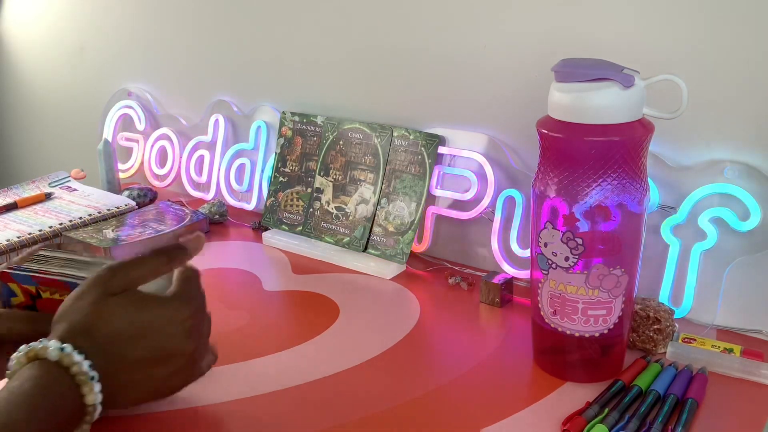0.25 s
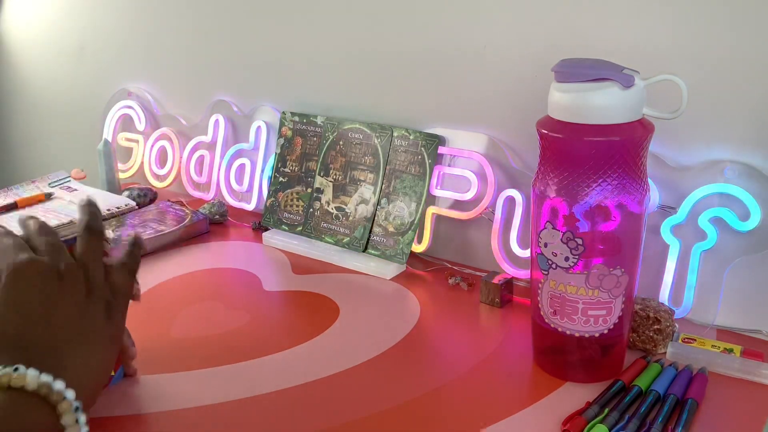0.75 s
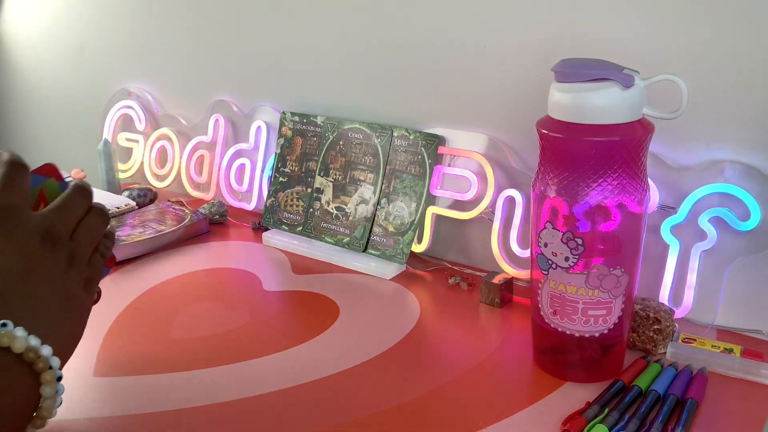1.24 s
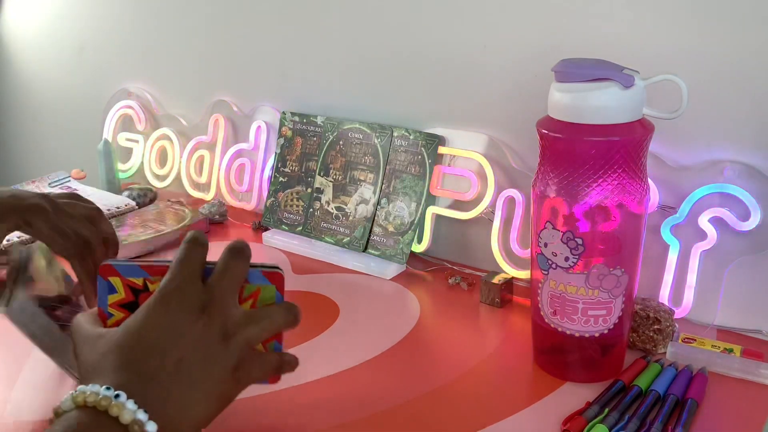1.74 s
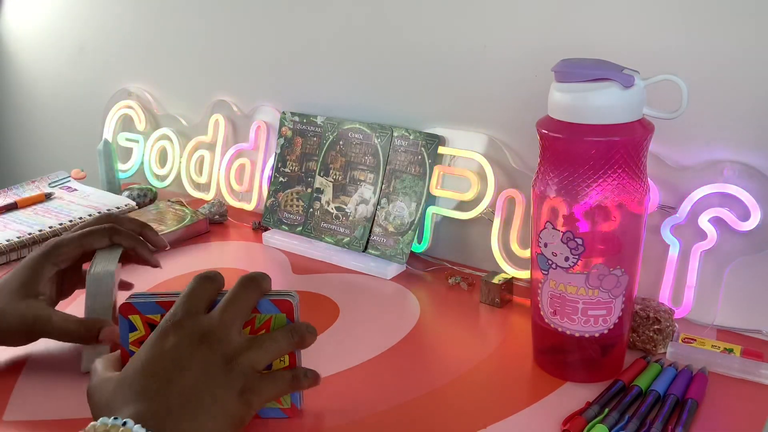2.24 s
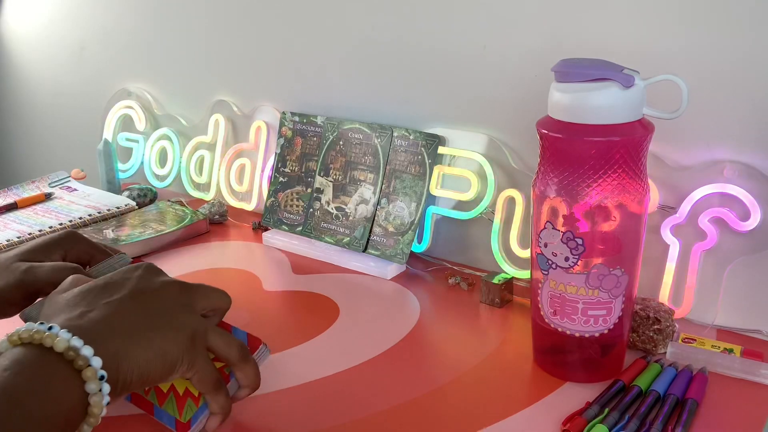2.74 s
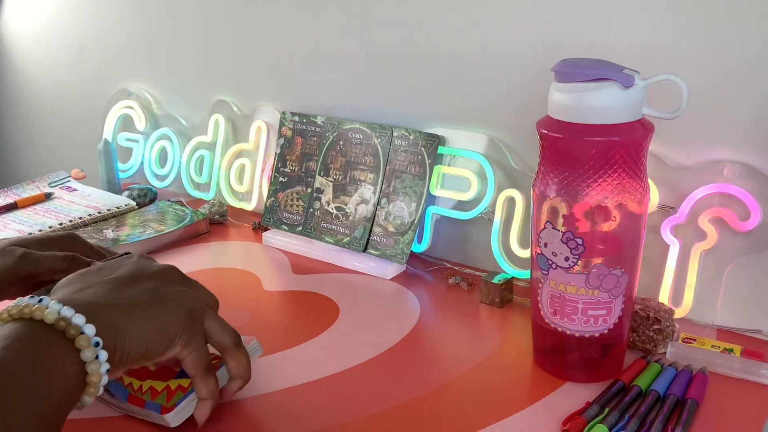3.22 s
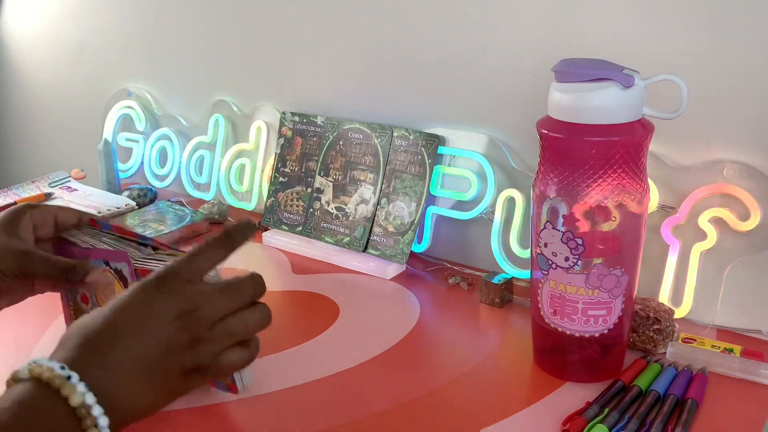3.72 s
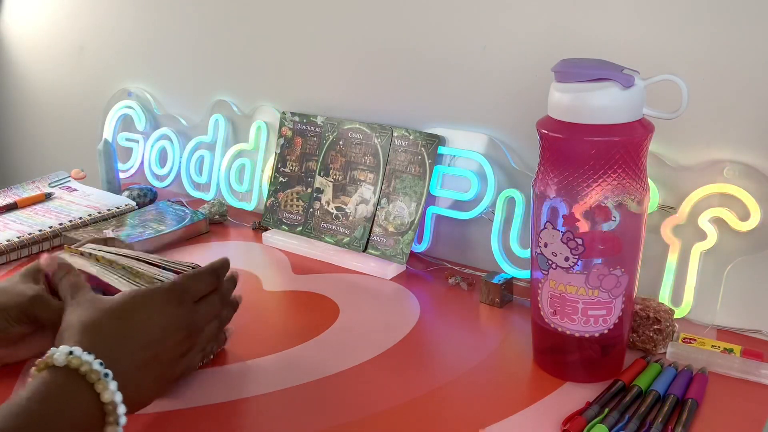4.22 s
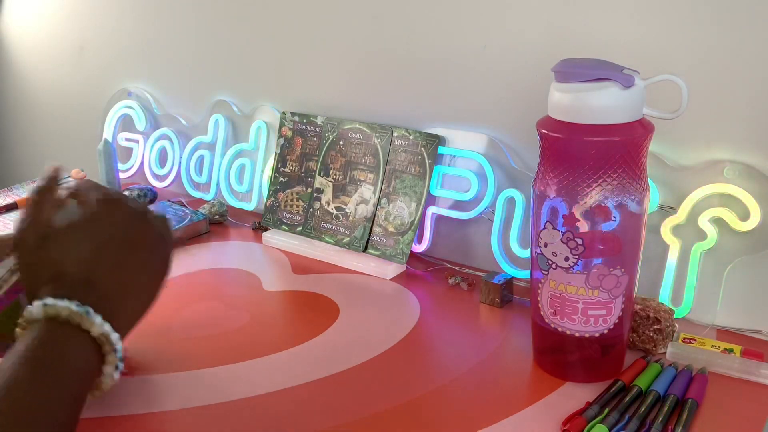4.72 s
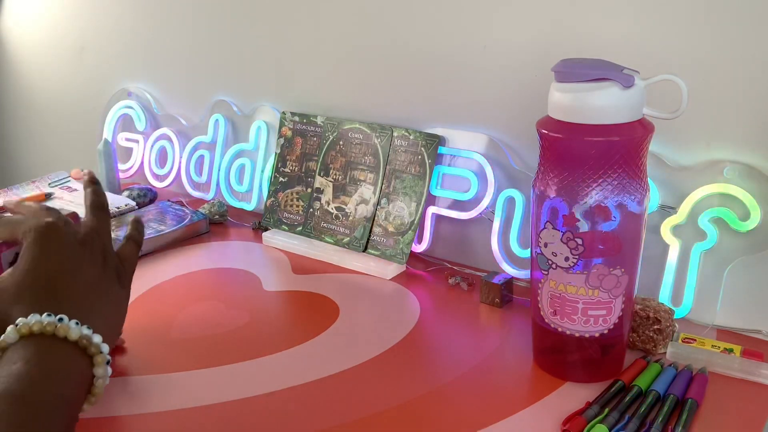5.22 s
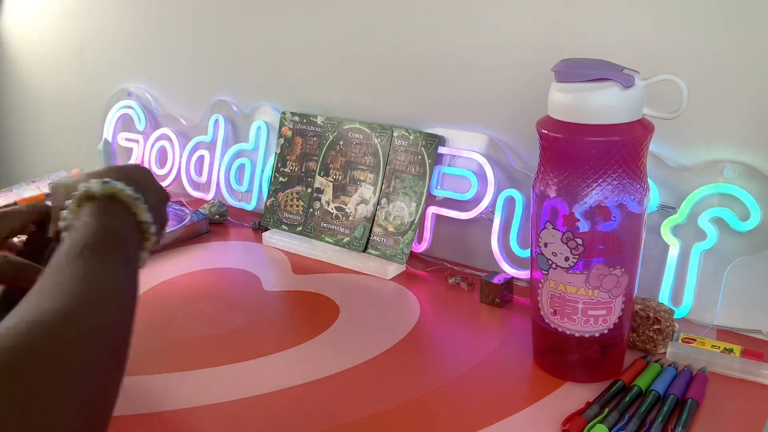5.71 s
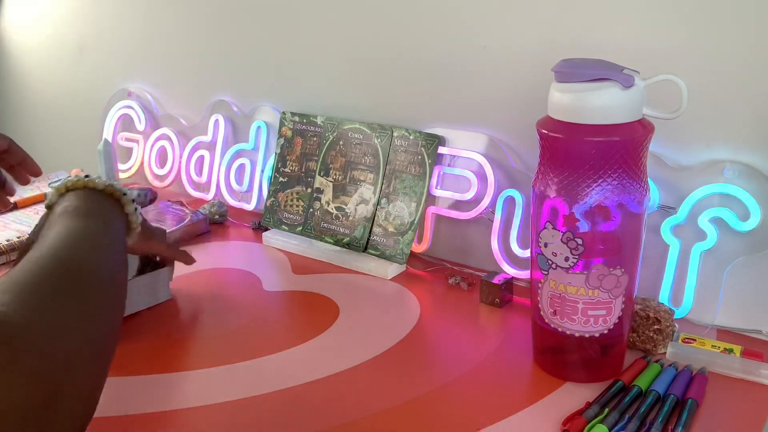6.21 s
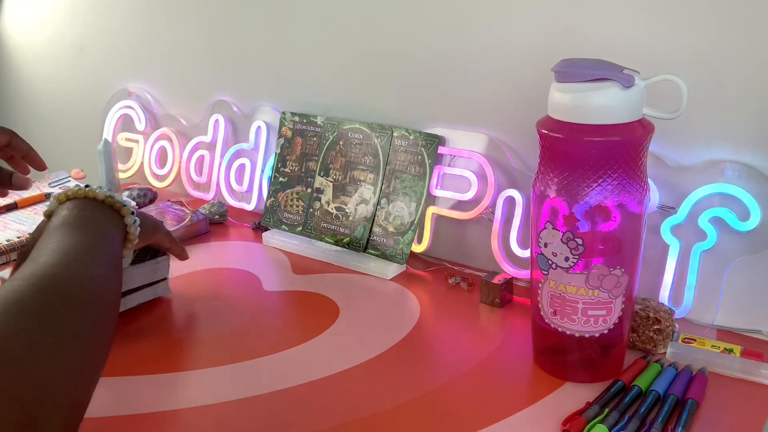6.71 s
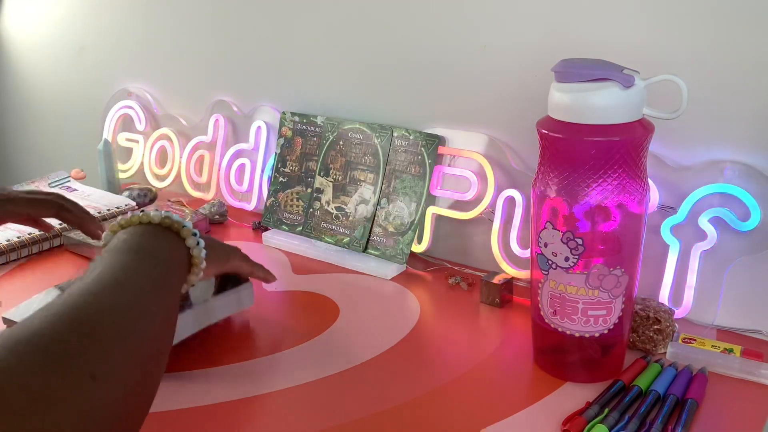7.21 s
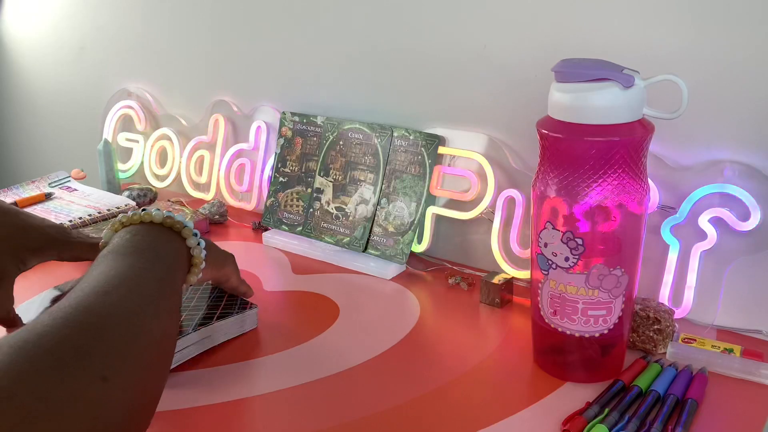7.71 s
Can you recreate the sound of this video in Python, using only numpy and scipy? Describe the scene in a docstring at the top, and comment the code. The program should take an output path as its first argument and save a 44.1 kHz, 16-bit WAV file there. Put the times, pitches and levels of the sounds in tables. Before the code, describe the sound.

Close by, hands cut a deck of cards with scattered slaps, brief slides and small clicks of fingernails and bracelet beads. About three seconds in comes a short, crisp riffle, followed by a burst of brisk tapping and sliding as the deck is squared. Then come separate, dull knocks of cards on the desk top. The small room adds a short echo and a faint rumble.

```python
"""A desk in a small, quiet room: a deck of cards is cut, riffled and squared by hand.
Packets slide with stick-slip friction and slap together, nails and bracelet beads tick, fingers rub
on card, and knocks ring the desk top. In the riffle, single cards snap off the thumbs and drum
on the desk. Short echoes and a low room rumble surround it all."""
import sys
import numpy as np
from scipy import signal
from scipy.fft import rfft, irfft
from scipy.io import wavfile
from scipy.ndimage import uniform_filter1d

SR = 44100
rng = np.random.default_rng(int(sys.argv[2]) if len(sys.argv) > 2 else 0)


def int16_out(signal):
    """Quantize to a 16-bit WAV file."""
    q = np.round(np.clip(np.atleast_2d(signal).T, -1, 1) * 32767)
    wavfile.write(sys.argv[1], SR, q.astype(np.int16))


N = 350595
TIME_S, SCENE_HZ = np.arange(N) / SR, np.fft.rfftfreq(N, 1 / SR)
TAPS = 2048
BIN_HZ = np.fft.rfftfreq(TAPS, 1 / SR)


def amp(db):
    """Decibels to gain."""
    return 10 ** (np.asarray(db) / 20)


def unit_rms(x):
    """Scales to rms 1."""
    return x / np.sqrt(np.mean(x ** 2) + 1e-20)


def unit_energy(x):
    """Scales to a sum of squares of 1."""
    return x / np.linalg.norm(x)


def curve(points, hz=BIN_HZ):
    """Interpolates a table over log frequency."""
    freq_hz, value = np.transpose(points)
    return np.interp(np.log(hz + 1), np.log(freq_hz + 1), value)


def treble(corner_hz):
    """Soft step from 0 to 1 around a corner."""
    return BIN_HZ ** 4 / (BIN_HZ ** 4 + corner_hz ** 4)


def resonance(hz, width):
    """Peak of height 1; width is a fraction of the pitch."""
    return 1 / (1 + ((BIN_HZ / hz - 1) / width) ** 2)


def colour(x, gain_db):
    """Minimum-phase filter of unit energy; attacks stay sharp."""
    log_gain = np.log(amp(np.maximum(gain_db, np.max(gain_db) - 90)))
    mirrored = np.concatenate([log_gain, log_gain[-2:0:-1]])
    kernel = np.fft.ifft(np.exp(np.conj(signal.hilbert(mirrored)))).real
    return signal.fftconvolve(x, unit_energy(kernel))


def grains(size, per_s, spread_db):
    """Sparse random clicks of uneven strength, rms 1."""
    strength = amp(spread_db * np.minimum(rng.exponential(1, size), 4))
    return unit_rms(strength * rng.choice([-1, 1], size) * (rng.random(size) < per_s / SR))


def add(mix, start_s, sound):
    """Mixes a sound in at start_s."""
    part = mix[max(round(start_s * SR), 0):][:len(sound)]
    part += sound[:len(part)]


# Room noise spectrum: freq_hz, gain_db
NOISE_SPECTRUM = [(25, -25), (55, -3.5), (130, -14), (270, -31), (600, -43.5), (2000, -53.5), (5000, -58.5),
                  (16000, -58)]

def room_noise(level_db=-58):
    """Low rumble and faint hiss."""
    spectrum = rfft(rng.standard_normal(N)) * amp(curve(NOISE_SPECTRUM, SCENE_HZ))
    return amp(level_db) * unit_rms(irfft(spectrum, N))


# Packet body spectrum, for slides and slaps: freq_hz, gain_db
PACKET_SPECTRUM = [(60, -2.5), (130, -3), (300, -10.5), (450, -8.5), (620, -2.5), (1550, -3.5), (2400, -8),
                   (4000, -16.5), (5800, -26), (16000, -50.5)]
# Card edge spectrum: freq_hz, gain_db
EDGE_SPECTRUM = [(1000, -32), (3500, 6.5), (5500, 3), (8000, 4.5), (12000, 1), (16000, -1.5)]
# Sliding strokes: peak_s, face_db, edge_db, rise_s, fade_s
SLIDE_STROKES = [(0.005, -32.5, -58.5, 0.013, 0.054), (1.39, -73, -75, .09, .02),
                 (1.785, -27, -53, 0.012, 0.014), (1.941, -37.5, -59, 0.0083, 0.073),
                 (2.309, -62.5, -69, 0.073, 0.11), (3.41, -40.5, -34.5, 0.0084, 0.021),
                 (3.75, -46.5, -51, 0.014, 0.024), (3.865, -19, -52.5, 0.0059, 0.061),
                 (3.965, -32.5, -32.5, 0.038, 0.025), (4.14, -38.5, -59.5, 0.014, 0.02),
                 (4.21, -26.5, -41.5, 0.03, 0.0393), (4.451, -50, -63, 0.034, 0.075),
                 (5.085, -31, -58.5, 0.0041, 0.057), (5.499, -52.5, -59, 0.011, 0.0079),
                 (5.97, -57, -59, 0.045, 0.069)]

def packet_slides(face_trim_db=-3, edge_trim_db=-2, catch_db=2, catch_s=0.004):
    """Cards catch and slip: face friction sounds in the packet, the edges hiss."""
    span = round(catch_s * SR)
    wander = uniform_filter1d(uniform_filter1d(rng.standard_normal(N), span), span)
    catching = unit_rms(amp(catch_db * unit_rms(wander)))
    face = catching * unit_rms(colour(grains(N, 3000, 4), curve(PACKET_SPECTRUM))[:N])
    edge = catching * unit_rms(colour(grains(N, 3300, 2.1), curve(EDGE_SPECTRUM))[:N])
    out = np.zeros(N)
    for peak_s, face_db, edge_db, rise_s, fade_s in SLIDE_STROKES:
        t = TIME_S - peak_s
        speed = np.exp(-np.maximum(-t / rise_s, t / fade_s))
        out += speed * (face * amp(face_db + face_trim_db) + edge * amp(edge_db + edge_trim_db))
    return out


# Packet landings: start_s, level_db, treble_db, settle_s, hollow_hz
LANDINGS = [(0.062, -30.5, -33, 0.0068, 1700), (0.687, -13.5, -33, 0.017, 1820),
            (1.555, -50.5, 3, 0.034, 580), (1.586, -33, -37, 0.002, 590), (1.751, -27.5, -51, 0.04, 590),
            (1.783, -19.5, -13.5, 0.0049, 1680), (1.923, -14.5, -32.5, 0.0081, 1630),
            (1.983, -21.5, -34, 0.0051, 850), (2.033, -19, -21, 0.0031, 2370),
            (2.198, -30.5, -58, 0.0039, 1650), (3.711, -19, -50, 0.024, 1300),
            (3.845, -14.5, -12.5, 0.0087, 1440), (3.861, -8, -18.5, 0.0041, 1420),
            (3.938, -22, -6, 0.012, 1780), (4.119, -27, -20, 0.011, 1690),
            (4.148, -21.5, -10, 0.0019, 1640), (4.202, -14, -6.5, 0.004, 1780),
            (4.229, -20, -14, 0.002, 1500), (4.344, -21.5, -28, 0.0031, 1530),
            (4.381, -35, -37, 0.0078, 1450), (4.456, -29.5, -35, 0.0059, 560),
            (5.081, -10.5, -46.5, 0.01, 703), (5.114, -10.5, -43.5, 0.01, 754),
            (5.719, -40.5, -34, 0.013, 1060), (6.02, -20.5, -33, 0.0018, 757),
            (6.76, -23, -15.5, 0.0018, 790), (7.262, -30, -40, 0.0026, 696),
            (7.705, -51, -26.5, 0.038, 782)]

def packet_slaps(trim_db=-7, neutral_db=-24, rise_s=0.0023, brush_db=-14, brush_s=0.0047, hollow_db=6):
    """A few cards brush, the bulk clacks and settles; the hollow between the hands rings."""
    out, t = np.zeros(N), np.arange(-TAPS // 2, 2 * TAPS) / SR
    after_s = np.maximum(t, 0)
    brush = amp(brush_db) * np.exp(-abs(t) / brush_s)
    clack = 0.5 * (t > rise_s) * np.exp(-abs(t - rise_s) / 0.001)
    for start_s, level_db, treble_db, settle_s, hollow_hz in LANDINGS:
        settle_s = max(settle_s, rise_s)
        settling = (1 - np.exp(-after_s / rise_s)) * np.exp(-after_s / settle_s)
        contacts = grains(len(t), 7000, 2.2) * (brush + clack + settling)
        # Flat landing: dull, full. Edge landing: bright, thin.
        bright_db = treble_db - neutral_db
        corner_hz = 4500 * 2 ** (min(bright_db, 0) / 45)
        tilt_db = bright_db * (treble(corner_hz) - 0.047 * (1 - treble(850)))
        ring_db = hollow_db * resonance(hollow_hz, width=0.24)
        slap = unit_energy(colour(contacts, curve(PACKET_SPECTRUM) + tilt_db + ring_db))
        add(out, start_s + t[0], amp(level_db + trim_db) * slap * np.sqrt(settle_s * SR))
    return out


# Hard contact spectrum: freq_hz, gain_db
TICK_SPECTRUM = [(300, -25), (2000, -25), (4000, -13.5), (7000, -5.5), (11000, 3), (15000, 3.5),
                 (17000, -4)]
# Nail and bead contacts: start_s, level_db
TICK_HITS = [(0.0653, -35), (0.201, -39), (0.224, -50), (0.4321, -43), (0.458, -35.5), (0.463, -36.5),
             (0.562, -51.5), (0.6515, -49), (0.793, -45), (0.8233, -39.5), (1.751, -43), (2.133, -56.5),
             (2.4544, -53.5), (4.428, -52), (4.4483, -40), (4.5409, -43), (4.582, -39.5), (4.759, -42),
             (4.7663, -38.5), (4.7782, -42.5), (4.9598, -45.5), (5.081, -48.5), (5.196, -53), (5.236, -53),
             (5.2696, -48.5), (5.336, -52.5), (5.483, -50), (5.676, -56), (5.730, -51), (5.815, -50),
             (6.764, -45.5)]

def nail_and_bead_ticks(trim_db=-6, crack_s=0.0007, rebound_s=0.0077):
    """Hard contacts with tiny rebounds; each spot rings at its own pitch."""
    out, t = np.zeros(N), np.arange(TAPS) / SR
    for start_s, level_db in TICK_HITS:
        crack = rng.standard_normal(TAPS) * np.exp(-t / crack_s)
        rebounds = 0.098 * grains(TAPS, 700, 0.94) * np.exp(-t / rebound_s)
        spot_db = 6 * resonance(rng.uniform(3000, 9000), width=0.2)
        tick = unit_energy(colour(crack + rebounds, curve(TICK_SPECTRUM) + spot_db))
        add(out, start_s, amp(level_db + trim_db) * tick * np.sqrt(0.0066 * SR))
    return out


def after_clicks(trim_db=-27, linger_s=0.12):
    """Card corners and beads click on faintly after each tick."""
    stir = np.zeros(N)
    for start_s, level_db in TICK_HITS:
        t = TIME_S - start_s
        stir = np.maximum(stir, amp(level_db) * np.exp(-abs(t) / linger_s) * (t > 0))
    clicks = colour(grains(N, 60, 2.5), curve(TICK_SPECTRUM))[:N]
    return amp(trim_db) * stir * unit_rms(clicks)


# Finger drags: peak_s, level_db, pitch_hz, half_length_s
FINGER_DRAGS = [(0.508, -57, 556, 0.014), (1.548, -55.5, 1377, 0.015), (2.325, -52, 702, 0.033),
                (3.735, -30.5, 980, 0.017), (4.495, -48, 650, 0.02), (4.535, -47, 867.5, 0.014),
                (4.831, -58.5, 555, 0.015), (7.894, -53.5, 667, 0.052)]

def finger_rubs(width=0.64, glide_oct_per_s=5):
    """Skin drags on card: friction in one resonance that climbs as the finger tightens."""
    out, t = np.zeros(N), np.arange(-TAPS * 2, TAPS * 2) / SR
    for peak_s, level_db, pitch_hz, half_length_s in FINGER_DRAGS:
        carrier = np.exp(2j * np.pi * np.cumsum(pitch_hz * 2 ** (glide_oct_per_s * t)) / SR)
        pole = np.exp(-np.pi * width * pitch_hz / SR)
        baseband = signal.lfilter([1], np.poly([pole, pole]), rng.standard_normal(len(t)) / carrier)
        rub = unit_rms((carrier * baseband).real)
        add(out, peak_s + t[0], amp(level_db) * rub * np.exp(-(t / half_length_s) ** 2))
    return out


def mode_envelope(t, rise_s, t60_s):
    """A mode builds up, then rings down."""
    return (1 - np.exp(-(t / rise_s) ** 2)) * np.exp(-np.log(1000) * t / t60_s)


BOOM_LOW_HZ, BOOM_HIGH_HZ = 50.6, 57.2
# Desk top modes: pitch_hz, level_db, t60_s, rise_s
DESK_MODES = [(100.6, -8, 0.22, .02), (138.2, 0.5, 0.25, 0.007), (222, -9.5, 0.19, 0.003),
              (348, -16, 0.15, .004)]
# Deck and hands on the desk: start_s, level_db, boom_db, thud_db, thud_hz
KNOCK_HITS = [(0.708, -30, 5, -1.5, 480), (1.590, -30, 3.5, -11.5, 249), (2.555, -43, 2, -9, 543),
              (3.366, -35.5, -3, 5, 298), (3.861, -43.5, 13, -4, 204), (5.087, -23.5, -11, -7.5, 520),
              (5.735, -37, 4.5, -7.5, 300), (6.021, -21.5, 5, 2, 217), (6.762, -25.5, -8.5, -4.5, 180.1),
              (7.280, -22.5, -5, -4, 373)]

def desk_knocks(spread_db=1.0, detune=0.02, thud_s=0.024, dull_hz=900):
    """A damped packet thuds and rings the top; the whole desk booms in two beating modes."""
    out, t = np.zeros(N), np.arange(SR) / SR
    beating = np.sin(2 * np.pi * BOOM_LOW_HZ * t) - np.sin(2 * np.pi * BOOM_HIGH_HZ * t)
    boom = beating * mode_envelope(t, rise_s=0.022, t60_s=0.42)
    for start_s, level_db, boom_db, thud_db, thud_hz in KNOCK_HITS:
        add(out, start_s, amp(level_db + boom_db) * boom)
        body_db = 10 * np.log10(resonance(thud_hz, width=0.2) * (1 - treble(dull_hz)) ** 2)
        thud = unit_energy(colour(rng.standard_normal(SR) * np.exp(-t / thud_s), body_db))
        add(out, start_s, amp(level_db + thud_db) * thud * np.sqrt(thud_s * SR / 2))
        for pitch_hz, mode_db, t60_s, rise_s in DESK_MODES:
            spot, shift, phase = rng.standard_normal(3)  # each spot rings differently
            tone = np.sin(2 * np.pi * (pitch_hz * (1 + detune * shift) * t + phase))
            gain = amp(level_db + mode_db + spread_db * spot)
            add(out, start_s, gain * tone * mode_envelope(t, rise_s, t60_s))
    return out


RIFFLE_START_S, RIFFLE_END_S = 2.856, 3.41

def card_flow(settle_db, rise_s=0.0091, stop_s=0.015, settle_s=0.42):
    """Cards leave the thumbs at a steady rate, then the loose pile settles."""
    onset = np.exp(np.minimum(TIME_S - RIFFLE_START_S, 0) / rise_s)
    after_s = np.maximum(TIME_S - RIFFLE_END_S, 0)
    return onset * (np.exp(-after_s / stop_s) + amp(settle_db) * np.exp(-after_s / settle_s))


# Single card spectrum: freq_hz, gain_db
SNAP_SPECTRUM = [(50, -20), (130, -9.5), (250, -5.5), (800, -5), (1400, -1), (3000, -8), (5500, -12),
                 (8000, -14.5), (12000, -16.5), (16000, -18.5)]
# Single cards snapping, mostly off the thumbs in the riffle, a few later as packets drop: start_s, level_db,
# treble_db
CARD_SNAPS = [(2.855, -28.5, -3), (2.885, -27.5, -7), (2.923, -21, -0.5), (2.9598, -23, -6.5),
              (2.9666, -22, 1), (3.0005, -26.5, -2.5), (3.0066, -25.5, 3.5), (3.0268, -20.5, -14.5),
              (3.055, -23.5, -7.5), (3.062, -17, -1.5), (3.0761, -22, -7), (3.089, -25.5, -0.5),
              (3.133, -22.5, -9), (3.1507, -18.5, -11.5), (3.1681, -22.5, -11.5), (3.1819, -20, -14),
              (3.1972, -21, -8.5), (3.242, -24, -14.5), (3.248, -12.5, 0), (3.2538, -14.5, -14.5),
              (3.2768, -21.5, -1.5), (3.2958, -18.5, -4.5), (3.3204, -20.5, -10.5), (3.3331, -21, -8.5),
              (3.3475, -18, -14), (3.3665, -20, -11), (3.3723, -11, -0.5), (3.377, -14, 1),
              (3.537, -37.5, -11), (7.2795, -33.5, -2.5), (7.339, -49, -5)]

def riffle(trim_db=5, neutral_db=-6, corner_hz=4000, flutter_db=-48, flick_db=-44):
    """Cards peel off, crack onto the pile and rattle; light cards flick and edges flutter between."""
    out, t = np.zeros(N), np.arange(-TAPS // 4, TAPS) / SR
    peel = 0.3 * np.exp(-abs(t) / 0.001)
    crack = np.exp(-abs(t) / 0.0012)
    rattle = 0.11 * np.exp(-abs(t) / 0.0046)
    envelope = np.where(t < 0, peel, crack + rattle)
    for start_s, level_db, treble_db in CARD_SNAPS:
        spectrum_db = curve(SNAP_SPECTRUM) + (treble_db - neutral_db) * treble(corner_hz)
        snap = unit_energy(colour(rng.standard_normal(len(t)) * envelope, spectrum_db))
        add(out, start_s + t[0], amp(level_db + trim_db) * snap * np.sqrt(0.00084 * SR))
    flick_envelope = signal.fftconvolve(abs(grains(N, 70, 1.5)), envelope)[:N]
    flicks = amp(flick_db) * unit_rms(flick_envelope * rng.standard_normal(N))
    flutter = amp(flutter_db) * grains(N, 3000, 4.5)
    return out + card_flow(settle_db=-8.5) * colour(flicks + flutter, curve(SNAP_SPECTRUM))[:N]


def desk_patter(level_db=-32, low_hz=120, high_hz=520, grow_db_per_s=17):
    """Falling cards drum on the desk modes, harder as the pile grows."""
    modes = sum(amp(mode_db) * resonance(hz, width=0.08) for hz, mode_db, _, _ in DESK_MODES)
    band = treble(low_hz) * (1 - treble(high_hz))
    body = band + 1.3 * modes + 5 * resonance(BOOM_LOW_HZ, width=0.2)
    weight = amp(level_db + grow_db_per_s * np.minimum(TIME_S - RIFFLE_END_S, 0))
    falls = grains(N, 300, 1.0) * card_flow(settle_db=-30)
    return weight * colour(falls, 20 * np.log10(body))[:N]


# Room decay: freq_hz, t60_s
ROOM_DECAY = [(100, 0.44), (300, 0.6), (900, 0.44), (2100, 0.42), (3200, 0.29), (14000, 0.3)]

def room_echoes(x, early_db=-5.5, early_s=0.0082, late_db=-8, gap_s=0.0022, cycle_s=1.7):
    """Desk and wall echoes that shift as the hands move, then a short tail."""
    out, t = np.zeros(N), np.arange(SR) / SR
    angle = 2 * np.pi * TIME_S / cycle_s
    for blend in (np.cos(angle), np.sin(angle)):
        early = (grains(SR, 2500, 0.84) * (t > gap_s) * np.exp(-t / early_s))[:TAPS]
        out += amp(early_db) * signal.oaconvolve(x * blend, unit_energy(early))[:N]
    hz, frame_s, spectra = signal.stft(grains(SR, 5000, 0.87) * (t > gap_s), SR, nperseg=256)
    decay = np.exp(-np.log(1000) * frame_s / curve(ROOM_DECAY, hz)[:, None])
    tail = signal.istft(spectra * decay, SR, nperseg=256)[1][:SR]
    return out + amp(late_db) * signal.fftconvolve(x, unit_energy(tail))[:N]


# Stereo side spectrum: freq_hz, gain_db
SIDE_SPECTRUM = [(60, -25), (250, -11), (700, -7.5), (2000, -2), (4500, -2), (7500, -6.5), (15000, -18)]

def scene(side_trim_db=4, knock_send=0.58, low_cut_hz=110):
    """Cards and desk in the centre; echoes and room noise differ left and right."""
    cards = riffle() + desk_patter() + packet_slaps() + packet_slides()
    cards += finger_rubs() + nail_and_bead_ticks() + after_clicks()
    knocks = desk_knocks()
    # The boom is too long a wave to scatter round the room.
    low_cut = signal.butter(2, low_cut_hz, "highpass", fs=SR, output="sos")
    send = signal.sosfilt(low_cut, cards + knock_send * knocks)
    mid = cards + knocks + room_echoes(send) + room_noise()
    width = amp(side_trim_db + curve(SIDE_SPECTRUM, SCENE_HZ))
    side = irfft(rfft(room_echoes(send) + room_noise()) * width, N)
    return np.array([mid + side, mid - side])


# Microphone balance: freq_hz, left_over_right_db
PORT_BALANCE = [(150, 1.6), (600, 0.5), (2000, -1), (8000, -0.15)]

def record(dry, split_hz=2700, phase_cycle_hz=3790, low_cut_hz=36, high_cut_hz=16200):
    """Two microphone ports, in phase in the bass, left leading in the treble; soft clip, band limit."""
    delay_rad = 2 * np.pi * SCENE_HZ / phase_cycle_hz
    lead_rad = (delay_rad - 0.38 * np.sin(2 * delay_rad)) * np.minimum(SCENE_HZ / split_hz, 1) ** 6
    lean = amp(curve(PORT_BALANCE, SCENE_HZ) / 2)
    ports = irfft(rfft(dry) * np.array([lean, np.exp(-1j * lead_rad) / lean]), N)
    low_cut = signal.butter(6, low_cut_hz, "highpass", fs=SR, output="sos")
    rounded = np.tanh(signal.sosfilt(low_cut, ports))
    high_cut = signal.firwin(255, high_cut_hz, window=("kaiser", 8), fs=SR)
    return signal.oaconvolve(rounded, high_cut[None], "same")


dry = scene()
out = record(dry)
int16_out(out)
```